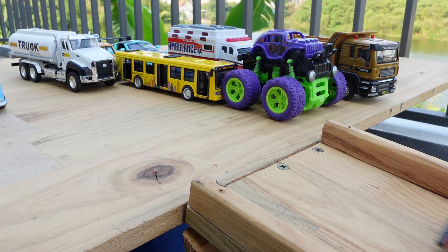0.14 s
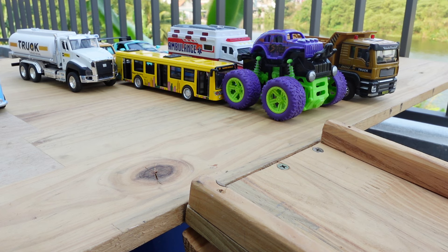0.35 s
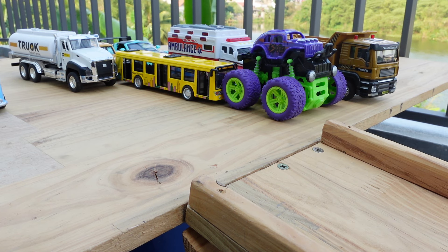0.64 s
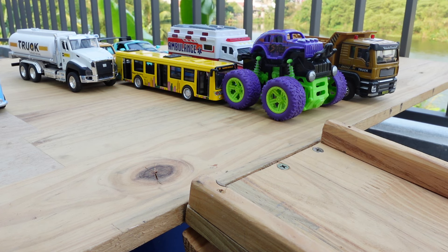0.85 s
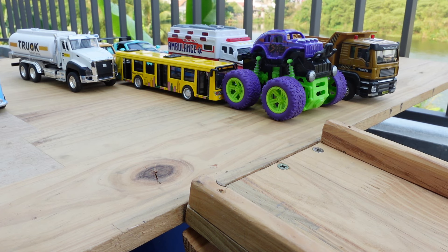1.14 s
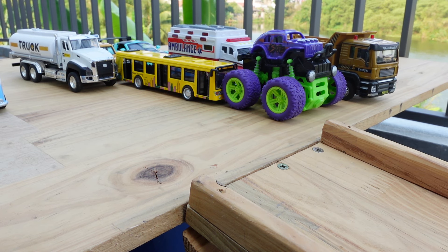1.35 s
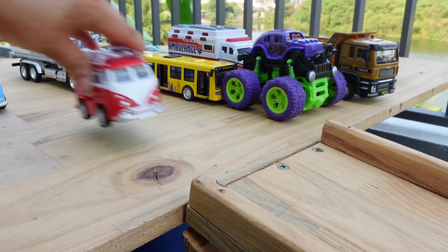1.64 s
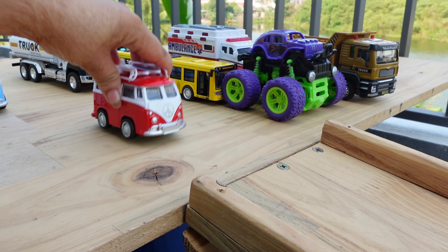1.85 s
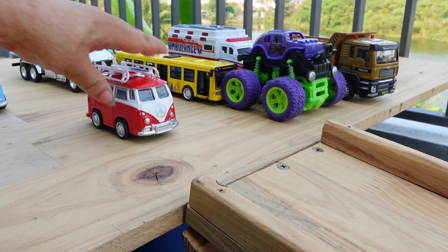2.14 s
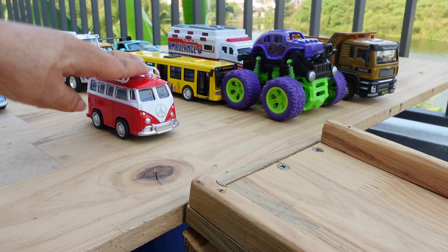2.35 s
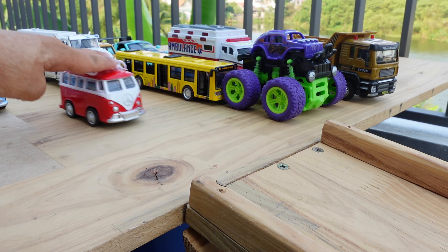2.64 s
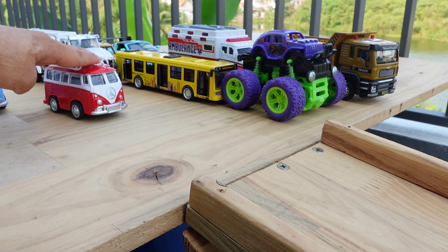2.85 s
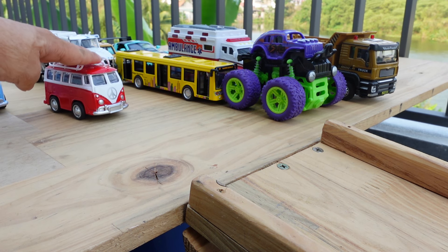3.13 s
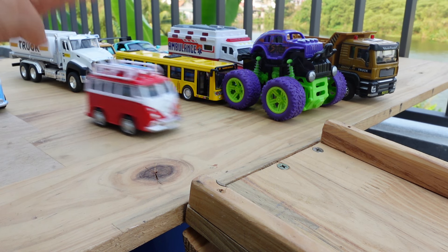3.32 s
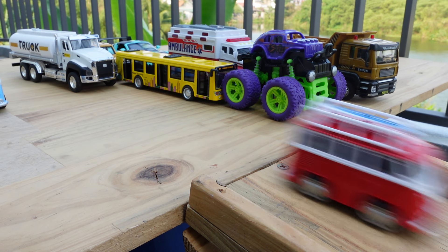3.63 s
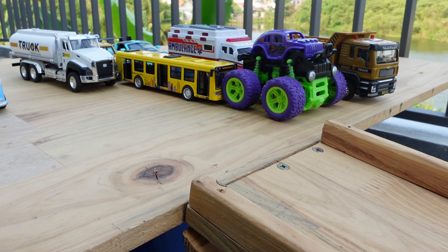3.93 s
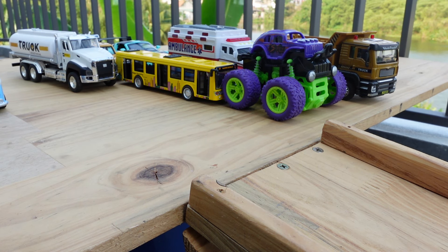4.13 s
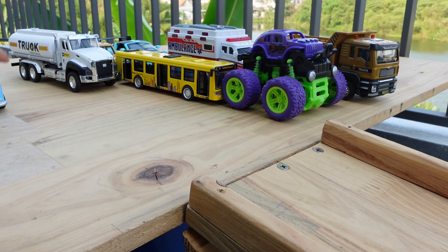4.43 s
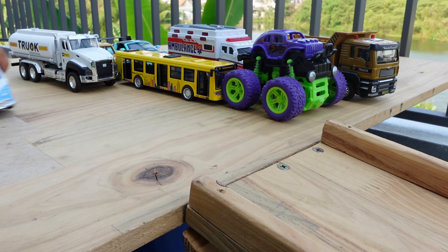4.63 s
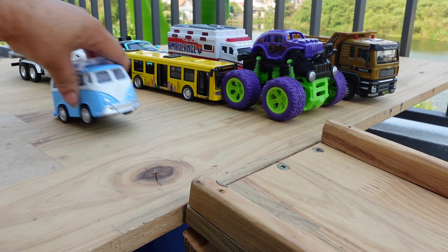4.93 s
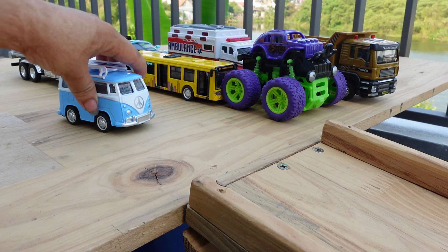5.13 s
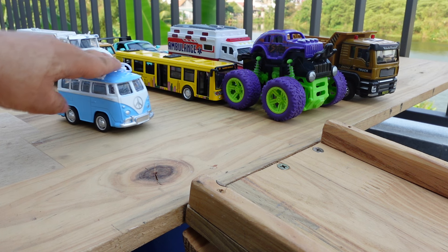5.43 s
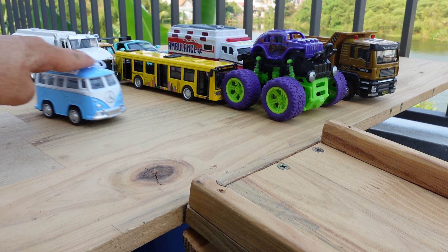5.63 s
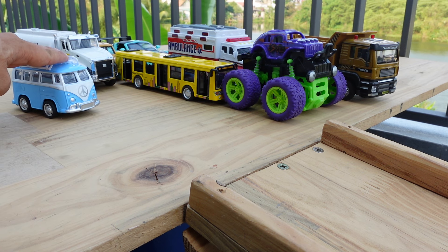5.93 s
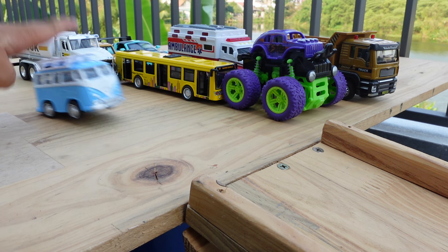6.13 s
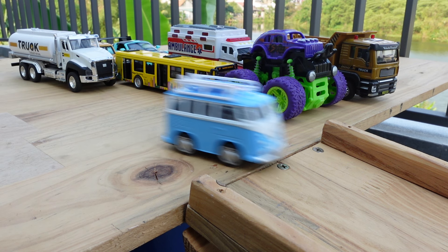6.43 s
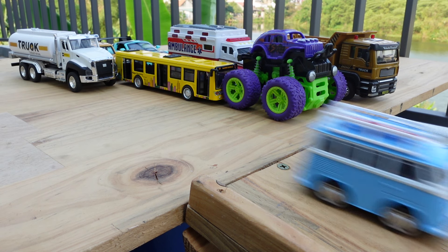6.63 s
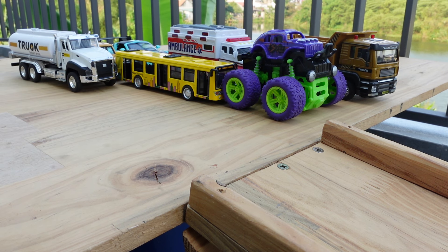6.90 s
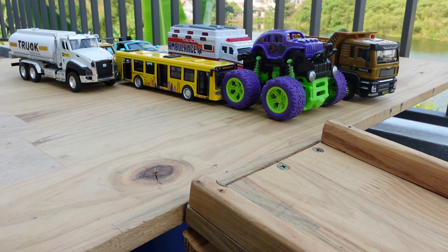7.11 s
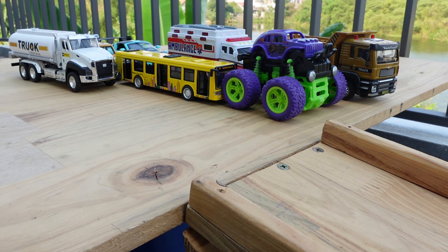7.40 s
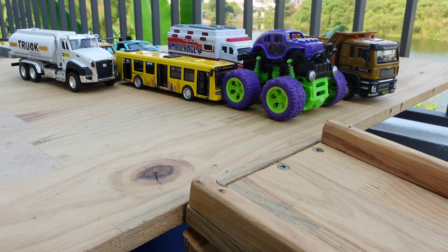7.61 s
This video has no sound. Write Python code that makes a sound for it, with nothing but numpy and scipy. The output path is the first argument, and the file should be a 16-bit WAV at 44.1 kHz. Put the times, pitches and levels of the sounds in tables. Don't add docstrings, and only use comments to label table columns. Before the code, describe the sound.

Close microphone on a porch table: light plastic and metal shells knock, wheels and gear teeth tick, and planks rumble beneath. Two main bursts of fast rattling follow isolated set-down clacks and brief winding noises, each dying into calm. Wind thumps low through the opening seconds, later mostly fading over soft outdoor noise. Short echoes scatter from boards and rails. Sound sits strongly left, clipping at peaks, with a faint copy right.

```python
import sys
import numpy as np
from scipy import signal
from scipy.fft import rfft, irfft
from scipy.io import wavfile
from scipy.ndimage import uniform_filter1d

SR = 44100
rng = np.random.default_rng(int(sys.argv[2]) if len(sys.argv) > 2 else 0)


def inscribe(sig):
    pcm = np.round(np.clip(np.atleast_2d(sig).T, -1, 1) * 32767)
    wavfile.write(sys.argv[1], SR, pcm.astype(np.int16))


def natural_amplitude(level_db):
    exponent = np.asarray(level_db, float) / 20
    return 10 ** exponent


N = 342216

# pitch [Hz], width [Hz], level [dB].
SHELL_MODES = [(2190, 790, -2), (2610, 94, 7), (3992, 260, 3.5), (5400, 87, -16), (9100, 280, -35),
               (11500, 95, -41)]
# pitch [Hz], level [dB], time to die by 60 dB [s].
TABLE_MODES = [(136, -7.5, 0.09), (250.2, 1, 0.063), (393.7, -3, 0.053), (571.7, -2.5, 0.039),
               (798, -7, 0.051)]


def evened(x):
    return x / np.sqrt(np.mean(x ** 2) + 1e-20)


def steady(x, seconds):
    slow_power = uniform_filter1d(x ** 2, int(seconds * SR))
    return x / np.sqrt(slow_power + 1e-3 * np.mean(x ** 2))


def band(x, lo_hz, hi_hz):
    edges_hz = [lo_hz, min(hi_hz, 0.45 * SR)]
    return signal.sosfilt(signal.butter(2, edges_hz, "band", fs=SR, output="sos"), x)


def read(points, hz):
    point_hz, value = np.transpose(points)
    return np.interp(np.log(hz + 1), np.log(point_hz + 1), value)


def colour(x, points):
    hz = np.fft.rfftfreq(len(x), 1 / SR)
    return irfft(rfft(x) * natural_amplitude(read(points, hz)), len(x))


def resonate(x, hz, width_hz):
    r = np.exp(-np.pi * width_hz / SR)
    return signal.lfilter([1 - r, 0, r - 1], [1, -2 * r * np.cos(2 * np.pi * hz / SR), r * r], x)


def ring(t, hz, db, t60, phase):
    t = t[:, None]
    tones = natural_amplitude(db - 60 * t / t60) * np.sin(2 * np.pi * (hz * t + phase))
    return tones.sum(1)


def add(mix, s, sound):
    part = mix[round(s * SR):][:len(sound)]
    part += sound[:len(part)]


def wind():
    # time [s], buffet level [dB], flutter level over the buffet [dB].
    gusts = [(0.0, -11.5, -13.5), (0.06, -9, -16.5), (1.23, -11, -14), (1.38, -18, -15.5),
             (1.51, -21.5, -12.5), (2.03, -16, -10.5), (2.14, -28.5, -5), (2.2, -11.5, -19),
             (2.77, -26, -4), (2.92, -11, -17.5), (3.18, -7.5, -16.5), (3.8, -33, 2), (3.98, -32, -4),
             (4.52, -50.5, 7), (6.07, -45.5, 6), (6.33, -28, 3.5), (6.59, -47, 8), (7.07, -34, -0.5),
             (7.3, -60, 5), (7.76, -30.5, -4.5)]
    # pitch [Hz], level [dB per Hz].
    buffet_tone = [(5.9, -27), (10, -7), (32, -0.5), (48, -0.5), (118, -16), (173, -20.5), (221, -28),
                   (296, -26.5), (425, -42), (500, -32), (650, -66), (1100, -120)]
    s, buffet_db, flutter_db = np.transpose(gusts)
    t = np.arange(N) / SR
    slow, fast, puffing = rng.standard_normal((3, N))
    lumps = steady(band(colour(slow, buffet_tone), 11.7, 79.5), 0.099)
    puffs = natural_amplitude(2.8 * evened(band(puffing, 3.3, 25)))
    flutter = steady(puffs * band(colour(fast, buffet_tone), 77.3, 620), 0.15)
    flutter = natural_amplitude(np.interp(t, s, flutter_db)) * flutter
    return natural_amplitude(np.interp(t, s, buffet_db)) * (lumps + flutter)


def open_air():
    # pitch [Hz], level [dB per Hz].
    air_tone = [(35, -40.5), (60, -18.5), (101, -7.5), (118, -2.5), (140, -7), (164, -13.5), (392, -17),
                (721, -22), (773, -23), (849, -24.5), (7520, -42), (15200, -55), (16300, -66)]
    far, drone, swelling = rng.standard_normal((3, N))
    swell_db = 2.2 * evened(band(swelling, 0.24, 6.7))
    wash = natural_amplitude(-39.5 + swell_db) * evened(colour(far, air_tone))
    hum = natural_amplitude(-46) * evened(resonate(drone, 133, 8.7))
    return wash + hum


def rolling(ticks_per_s=700, spread_db=5.0, hiss=0.38, ringing=0.45):
    # time [s], level [dB], brightness [dB], board rumble [dB].
    rolls = [
        [(0.0, -42.5, -2, 6.5), (0.538, -43.5, -10.5, 8), (0.912, -33, -1.5, 5.5), (1.2, -42, -2, -2)],
        [(1.4, -45.5, 1, 0), (1.78, -49, 2, 4), (1.8, -44, -2, 13)],
        [(2.1, -45.5, 0, 2.5), (2.722, -40, -2, 4), (2.9, -46.5, 5.5, 9)],
        [(3.15, -52, 15, 12), (3.844, -27, -11, -8), (4.22, -64, 4.5, 32.5)],
        [(5.5, -40, -3.5, -2.5), (6.142, -48, 0, 7), (6.396, -39.5, -2, -7.5), (6.924, -21, -5, -14.5),
         (7.15, -67.5, 14.5, 36)],
        [(7.6, -53, -17, 1), (7.616, -61, -10, -5), (7.76, -48.5, 9.5, 13)],
    ]
    # pitch [Hz], level [dB per Hz].
    tread_tone = [(530, -26), (900, 11), (1370, 8.5), (2420, 13.5), (2690, -17.5), (3260, 12), (3860, 15),
                  (7230, -26), (9200, -38), (16000, -38)]
    t = np.arange(N) / SR
    strength = natural_amplitude(spread_db * np.minimum(rng.exponential(1, N), 4))
    ticks = (rng.random(N) < ticks_per_s / SR) * strength
    burst = signal.lfilter([1], [1, -np.exp(-1 / (0.0014 * SR))], ticks)
    drive = (evened(burst) + hiss) * rng.standard_normal(N)

    rung = sum(natural_amplitude(db) * resonate(drive, hz, width) for hz, width, db in SHELL_MODES)
    shell = ringing * evened(rung) + (1 - ringing) * evened(colour(drive, tread_tone))
    boards = sum(natural_amplitude(db) * resonate(drive, hz, 2.5 / t60) for hz, db, t60 in TABLE_MODES[1:])
    boards = evened(boards) + 1.52 * evened(band(drive, 240, 1430))

    layers = [band(shell, 1100, 3010), band(shell, 2680, 14000), boards]
    gains = np.zeros((3, N))
    for rows in rolls:
        s, db, bright_db, rumble_db = np.transpose(rows)
        inside = (t >= s[0]) & (t < s[-1])
        fade = signal.windows.tukey(inside.sum(), 0.05)
        for gain, level_db in zip(gains, (db, db + bright_db, db + rumble_db)):
            add(gain, s[0], fade * natural_amplitude(np.interp(t[inside], s, level_db)))
    return sum(gain * steady(layer, 0.153) for gain, layer in zip(gains, layers))


def clack(row, luck, grit):
    s, db, hz, crack_db, thud_db, t60 = row
    t = np.arange(len(grit)) / SR
    t60 = np.clip(t60, 0.008, 0.06)

    modes_hz, _, modes_db = np.transpose(SHELL_MODES)
    pick = luck[:len(SHELL_MODES)]
    shell = ring(t, modes_hz * (0.94 + 0.12 * pick[::-1]), modes_db - 13 - 12 * pick, 0.52 * t60, 9 * pick)
    shell += ring(t, np.array([hz]), 0, t60, 0)
    chatter = band(grit, 1070, 4040) * natural_amplitude(-60 * t / (1.54 * t60))
    swell = 1 - np.exp(-t / 0.00049)
    body = swell * (shell / abs(shell).max() + 1.75 * chatter)

    sharp = band(band(grit[::-1], 3800, 10200), 4400, 17000)
    crack = swell * sharp * natural_amplitude(-60 * t / (0.3 * t60))

    wood_hz, wood_db, wood_t60 = np.transpose(TABLE_MODES)
    wood_db = wood_db - 8 * luck[-len(TABLE_MODES):]
    thud = (1 - np.exp(-t / 0.0021)) * ring(t, wood_hz, wood_db, wood_t60, 0)

    parts = [body, crack, thud]
    levels = natural_amplitude(db + np.array([0, crack_db, thud_db + 0.5]))
    return s, sum(level * part / abs(part).max() for level, part in zip(levels, parts))


def clacks():
    # (clack holds it between 0.008 and 0.06 s, so any longer value sounds as 0.06 s).
    knocks = [(0.187, -32.5, 1160, -29, -16, 0.88), (0.2356, -27.5, 1280, -29, -13, 6.0),
              (0.3289, -23.5, 1460, -30, 1, 1.2), (0.3716, -24.5, 1845, -30, -10, 0.86),
              (0.4217, -30.5, 1980, -35, 6, 0.036), (0.4758, -29.5, 1650, -36, 1, 0.082),
              (0.521, -35, 1820, -24, 1, 0.11), (0.5506, -25, 1860, -20, -10, 0.63),
              (0.6558, -22, 1520, -29, -8.5, 0.15), (0.6802, -14, 2180, -32, -11, 0.25),
              (0.764, -21, 1170, -4, -20, 0.38), (0.815, -14, 1654, -6, -7.5, 0.3),
              (0.888, -14, 3020, -18, -10.5, 0.21), (0.9337, -17.5, 1850, -11, -26, 0.69),
              (1.0753, -22, 2900, -18, -20, 0.14), (1.0923, -17, 1160, -29, -2, 0.38),
              (1.3106, -19, 4360, -6, -14, 0.06), (1.3738, -16, 3036, -37, -20, 0.12),
              (1.92, -5, 2196, -16, -13.5, 0.055), (1.945, -15, 3475, -30, -16, 0.11),
              (1.9786, -17.5, 3570, -31, -12, 0.091), (2.6536, -26.5, 2560, -31, -1, 6.0),
              (2.7094, -22.5, 2410, -26, 0, 0.6), (2.752, -16.5, 4320, -3, -13, 0.22),
              (2.815, -20.5, 4210, -31, -13, 0.21), (2.8938, -27.5, 2550, -8, -12, 0.053),
              (2.9193, -19.5, 4760, -2, -17, 0.03), (3.1702, -27.5, 1540, -16, -13, 0.46),
              (3.2, -25, 3890, -17, -15, 0.51), (3.237, -21, 2610, -16, -18, 0.1),
              (3.2654, -17.5, 3890, -4, -25, 0.13), (3.3153, -12.5, 3740, -20.5, -14, 0.1),
              (3.3189, -3, 4080, -22, -21, 0.23), (3.3584, -8, 1628, -20, -10.5, 0.17),
              (3.4117, -10, 3800, -24, -33, 0.12), (3.463, -23.5, 3830, -20, 2, 0.3),
              (3.485, -18.5, 2740, -10.5, -15, 6.0), (3.497, -10.5, 2610, -31, -22, 0.16),
              (3.5506, -8.5, 4330, -21.5, -13, 0.088), (3.5503, -21, 2610, -37, -25, 6.0),
              (3.5708, -7.5, 2120, -24.5, -26, 0.12), (3.6034, -6.5, 2265, -30, -28, 0.24),
              (3.665, -9, 1362, -25, -26, 0.12), (3.6894, -11, 1815, -18.5, -18, 0.094),
              (3.7169, -6.5, 1800, -40, -26, 0.22), (3.7893, -24.5, 2700, -10.5, -17, 0.18),
              (3.8272, -22, 1460, -33, -28, 6.0), (3.8462, -10.5, 2580, -27.5, -9, 0.17),
              (3.8682, -6, 3750, -20.5, -9.5, 0.19), (3.915, -12.5, 1400, -28, -4, 0.13),
              (3.9401, -19, 2120, -26, 1, 0.087), (3.9592, -13.5, 1384, -20.5, -14, 0.31),
              (3.9907, -6, 2610, -2, -10.5, 0.12), (4.0354, -19, 2140, -33, -16, 0.16),
              (4.0898, -18, 2910, 0, -0.5, 6.0), (4.1085, -11, 1417, -30, -9, 0.17),
              (4.1748, -10.5, 2210, -22, -28, 0.083), (4.3243, -29, 6300, -10, 3, 0.42),
              (4.3462, -29.5, 1220, -31, -5, 0.06), (4.551, -26.5, 1380, -42, -12, 0.12),
              (4.6695, -24, 1256, -30, -18, 0.13), (4.716, -26, 2780, -38, -22, 0.061),
              (4.9512, -26.5, 1320, -38, -14, 0.04), (4.968, -22, 3010, -38, -3, 0.09),
              (5.1155, -12, 2400, -19, -15, 0.049), (5.248, -26.5, 1470, -43, -5, 0.063),
              (5.5834, -35.5, 1880, 1, -4, 0.087), (5.847, -23.5, 1160, -33, -11, 0.26),
              (5.8845, -22, 3470, -21, -3.5, 0.03), (6.0392, -37, 2520, -13, 1, 0.14),
              (6.0423, -21.5, 2770, -13, -3, 0.32), (6.069, -16.5, 1475, -33, -19, 0.2),
              (6.102, -17.5, 1690, -20, -27, 0.16), (6.1172, -14.5, 4950, -4, -21, 0.2),
              (6.225, -5, 5020, -9, -9, 0.23), (6.2659, -2, 2410, -8, -17.5, 0.16),
              (6.3053, -6, 3650, -17, -34, 0.29), (6.338, -8, 3453, -14, -26, 0.1),
              (6.3647, -11.5, 3000, -23, -21, 0.17), (6.3861, -8.5, 3750, -23, -15.5, 0.15),
              (6.4282, -32, 2860, -29, -18, 0.21), (6.4275, -14, 3100, -15, -23, 0.21),
              (6.4432, -11.5, 3650, -10, -24, 0.28), (6.4747, -15.5, 1900, -27, -26, 0.077),
              (6.4993, -14.5, 1950, -22, -17, 1.4), (6.5066, -14.5, 3980, -25, -17, 0.14),
              (6.5333, -14, 1980, -21, -14, 0.17), (6.556, -19, 1094, -3.5, -21, 0.061),
              (6.557, -9.5, 1960, -23.5, -20, 0.078), (6.5936, -23.5, 1940, -24, -10, 6.0),
              (6.6152, -19.5, 1380, -27, -15, 0.28), (6.6425, -15, 2860, -27, -20, 0.1),
              (6.658, -5.5, 2014, -16, -32, 0.44), (6.7138, -9.5, 4060, -21, -29, 0.24),
              (6.7595, -22.5, 1890, -31, -31, 0.41), (6.8136, -21, 1290, -36, -25, 6.0),
              (6.8325, -9, 2785, -26, -16.5, 0.97), (6.8762, -8.5, 2790, -27, -15, 0.62),
              (6.9729, -5.5, 2190, -4, -15.5, 0.12), (7.0532, -7, 1400, -13, -18, 0.041),
              (7.0717, -13.5, 1350, -26, -16, 0.093), (7.096, -14.5, 1430, -18, -27, 0.052),
              (7.1081, -14.5, 2180, -22.5, -21, 0.12), (7.639, -33, 3950, -25, -7, 0.032),
              (7.659, -24, 2080, -29, -21, 6.0), (7.668, -23, 2090, -33, -22, 0.11)]
    out = np.zeros(N)
    luck = rng.random((len(knocks), 24))
    grit = rng.standard_normal((len(knocks), 4096))
    for row, own_luck, own_grit in zip(knocks, luck, grit):
        add(out, *clack(row, own_luck, own_grit))
    return out


def porch(x, t60=0.23, wet_db=-16):
    t = np.arange(6000) / SR
    signs = rng.choice([-1., 1.], len(t))
    present = (rng.random(len(t)) < 0.045) * (t > 0.003)
    echoes = signs * present * natural_amplitude(-60 * t / t60)
    return x + natural_amplitude(wet_db) * signal.fftconvolve(x, echoes / np.linalg.norm(echoes))[:N]


def scene():
    cars = porch(rolling() + clacks())
    mono = cars + wind() + open_air()
    return np.array([mono, mono])


def roll_off(x):
    return signal.sosfilt(signal.butter(12, 16460, fs=SR, output="sos"), x)


def record(dry):
    left = signal.lfilter(*signal.butter(1, 34.6, "high", fs=SR), dry[0])
    left = np.clip(natural_amplitude(5.5) * left, -1, 1)
    right = natural_amplitude(-15.5) * dry[1] + natural_amplitude(-86) * rng.standard_normal(N)
    return roll_off(np.array([left, right]))


dry = scene()
out = record(dry)
inscribe(out)
```